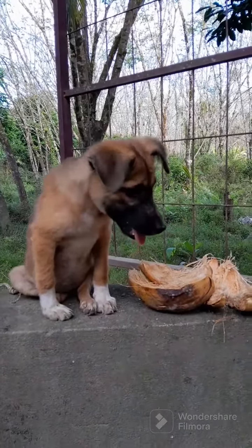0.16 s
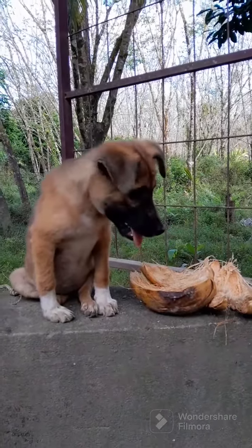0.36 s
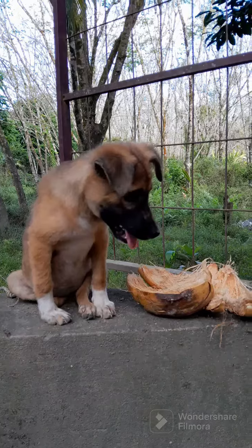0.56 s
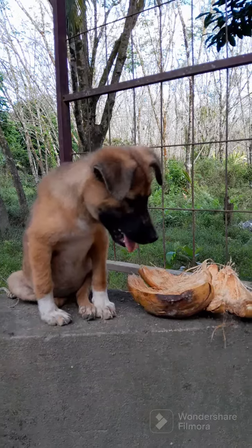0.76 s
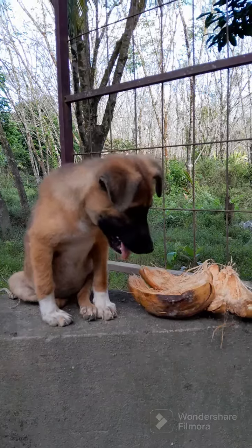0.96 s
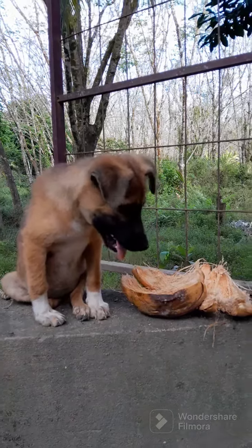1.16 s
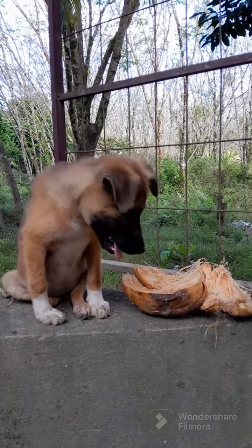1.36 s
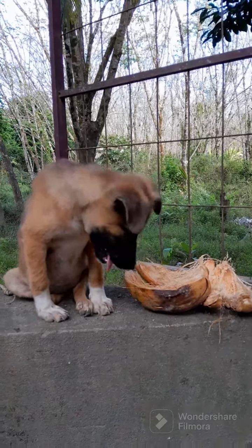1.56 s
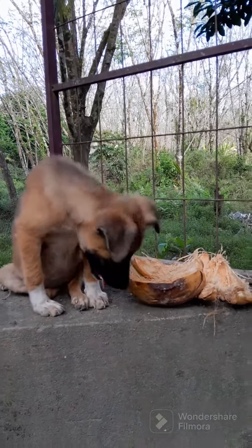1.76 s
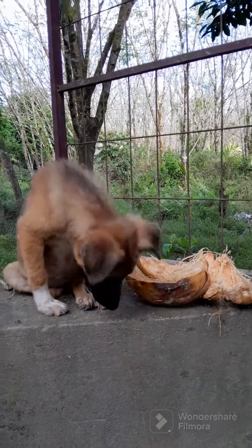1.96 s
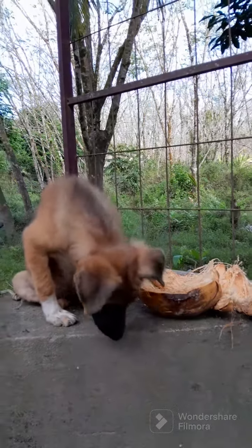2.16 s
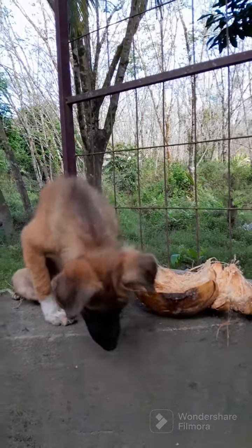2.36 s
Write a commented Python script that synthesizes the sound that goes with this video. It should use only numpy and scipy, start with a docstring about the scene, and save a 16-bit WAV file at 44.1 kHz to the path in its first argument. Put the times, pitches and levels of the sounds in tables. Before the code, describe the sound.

Two short gritty scuffs with soft low thumps on concrete, close to the microphone, then a single bright rising bird chirp echoing among trees, over quiet outdoor air, a distant motor hum and thin insect hiss.

```python
"""Scuffs and a chirp in a concrete yard by a wood

Two soft, gritty scuffs with low thumps sound close by, like steps on concrete; a few faint taps follow.
The scuffs are noise bursts that ring resonances; the thumps are filtered pushes that ring low modes.
A bird gives one loud rising chirp, a sweeping sine with overtones and hiss that rings among the trees.
Faint short glides are other calls, far off. Behind them lie a distant motor's hum, made of wavering
sines, and a low rumble, soft air and a thin hiss of insects, all made of coloured noise."""
import sys
import numpy as np
from scipy import signal
from scipy.fft import rfft, irfft
from scipy.io import wavfile

SR = 44100
rng = np.random.default_rng(int(sys.argv[2]) if len(sys.argv) > 2 else 0)


def bounce(signal):
    """Save signal as a 16-bit WAV file at the path given by the first command-line argument."""
    frames = np.transpose(np.atleast_2d(signal))
    limited = np.clip(frames, -1, 1)
    pcm = np.round(limited * 32767).astype(np.int16)
    wavfile.write(sys.argv[1], SR, pcm)


N = 110250
T = np.arange(N) / SR

# how alike left and right are in the chirp's hiss and the background: pitch_hz, correlation (-1 to 1)
STEREO_LIKENESS = [(100, 0.67), (300, 0.35), (700, 0.36), (1400, 0.11), (2800, -0.14), (6000, 0.021),
                   (14000, 0.0092)]
WOOD_T60_S = 0.34   # how long the trees ring on


def from_db(db):
    """Decibels to gain."""
    return 10 ** (np.asarray(db) / 20)


def rms_one(x):
    """Scale to rms 1."""
    return x / np.sqrt(np.mean(x ** 2) + 1e-20)


def in_time(rows):
    """Draw each column of a breakpoint curve at every sample."""
    s, *columns = np.transpose(rows)
    return [np.interp(T, s, column) for column in columns]


def at_hz(points, hz):
    """Read a spectrum on a log-frequency axis."""
    f, value = np.transpose(points)
    return np.interp(np.log(hz + 1), np.log(f), value)


def pan(db):
    """Left and right gains for a left-over-right level difference, at constant power."""
    return rms_one(from_db(np.array([[db], [-db]]) / 2))


def drift(rate_hz):
    """Random motion with spread 1: noise whose movement above the rate is damped."""
    hz = np.arange(N // 2 + 1) * SR / N
    return rms_one(irfft(rfft(rng.standard_normal(N)) / (1 + (hz / rate_hz) ** 2), N))


def coloured(spectrum, likeness, source=None):
    """Stereo noise (or two given signals) with a spectrum and a left-right likeness; rms 1."""
    hz = np.arange(N // 2 + 1) * SR / N
    mid, side = rfft(rng.standard_normal((2, N)) if source is None else source)
    alike = np.clip(at_hz(likeness, hz), -1, 1)
    shared = np.sqrt(1 + alike) * mid
    opposed = np.sqrt(1 - alike) * side * [[1], [-1]]
    return rms_one(irfft(from_db(at_hz(spectrum, hz)) * (shared + opposed), N))


def ring(x, hz, t60):
    """A two-pole resonator: a unit click sets a sine of height 1 ringing and dying."""
    radius = from_db(-60 / (t60 * SR))
    w = 2 * np.pi * hz / SR
    return signal.lfilter([0, np.sin(w)], [1, -2 * radius * np.cos(w), radius ** 2], x + 1e-18)


def echoes(x, t60):
    """Dense dying reflections from 4 ms on, different in each ear, with unit energy."""
    t = T[:SR]
    tail = rng.standard_normal((2, SR)) * from_db(-60 * t / t60) * (t > .004)
    tail /= np.sqrt(np.sum(tail ** 2, axis=1, keepdims=True))
    return signal.fftconvolve(np.atleast_2d(x), tail, axes=1)[:, :N]


def grains():
    """Sand grains cracking at random over a smooth rub."""
    grains_per_s, crack_share = 2500, 0.55   # share of the power
    cracks = rms_one(rng.standard_normal((2, N)) * (rng.random(N) < grains_per_s / SR))
    rub = rng.standard_normal((2, N))
    return np.sqrt(crack_share) * cracks + np.sqrt(1 - crack_share) * rub


def scuffs():
    """Each contact is a quick burst of dull crunch and bright grit; the crunch rings a few resonances."""
    # gritty contacts: start_s, crunch_level_db, grit_level_db, decay_s (time constant)
    contacts = [(0.2196, -36, -50, 0.005), (0.228, -42, -60, 0.0037), (0.23, -48, -40, 0.0039),
                (0.235, -33, -43, 0.0048), (0.246, -48.5, -51, 0.019), (0.280, -42, -66, 0.0025),
                (0.286, -39.5, -57, 0.0039), (0.2965, -39, -50, 0.0031), (0.336, -68, -68, .03),
                (0.374, -72.5, -67, 0.057), (0.424, -67.5, -71, 0.033), (0.45, -52.5, -61, 0.015),
                (0.468, -45, -52.5, 0.0053), (0.485, -47, -57, 0.0069), (0.501, -59, -57, 0.023),
                (0.509, -48, -77, 0.0051), (0.553, -64.5, -64.5, 0.035), (0.622, -93, -61, 0.0015),
                (1.167, -64, -71, .003), (1.738, -78, -75, 0.022), (2.333, -58.5, -63, 0.001)]
    # colours of the dull crunch and the bright grit: pitch_hz, relative_level_db (per Hz)
    crunch_colour = [(100, -4.5), (300, -9.5), (390, -4), (470, -7), (570, 2), (660, -5.5), (780, 1.5),
                     (1000, -3.5), (1200, -4.5), (1550, 1), (1900, -8.5), (2400, -8.5), (3200, -12.5),
                     (4200, -19), (9000, -54)]
    grit_colour = [(800, -44), (2500, -10), (4200, -0.5), (5700, 4.5), (8000, 1), (10000, -3.5),
                   (13000, -2), (16000, -6.5)]
    # left-right likeness of the scuffs: pitch_hz, correlation (-1 to 1)
    scuff_likeness = [(200, 0.93), (700, 0.82), (1400, 0.38), (2800, -0.58), (6000, 0.14), (14000, -0.18)]
    # resonances that the crunch sets ringing: pitch_hz, level_db, t60_s
    resonances = [(383.5, -3, 0.091), (600, -18, .08), (742, -5.5, 0.33), (992, -15, 0.042),
                  (1450, -33, 0.27), (1512, -2, 0.035)]
    shortest_attack_s, attack_per_decay = 0.0011, 0.28
    crunch_pan_db, yard_db, yard_t60_s = -1, -6, 0.17

    crunch_level, grit_level = 0, 0
    for s, crunch_db, grit_db, decay in contacts:
        age = np.maximum(T - s, 0)
        attack = shortest_attack_s + attack_per_decay * decay
        shape = np.minimum(age / attack, 1) * np.exp(-np.maximum(age - attack, 0) / decay)
        crunch_level = crunch_level + from_db(crunch_db) * shape
        grit_level = grit_level + from_db(grit_db) * shape
    crunch = pan(crunch_pan_db) * crunch_level * coloured(crunch_colour, scuff_likeness, grains())
    grit = grit_level * coloured(grit_colour, scuff_likeness, grains())
    rings = 0
    for hz, db, t60 in resonances:
        unit_peak = 2 * np.log(1000) / (t60 * SR)   # about gain 1 at the resonance
        rings = rings + from_db(db) * unit_peak * ring(crunch, hz, t60)
    close = crunch + rings + grit
    return close + from_db(yard_db) * echoes(close, yard_t60_s)


def thumps():
    """Soft pushes, with no deep bass in them, set a few damped modes swinging."""
    # pushes before filtering: start_s, level_db
    hits = [(0.2385, -15.5), (0.280, -25.5), (0.289, -25.5), (0.444, -41.5), (0.474, -41.5), (0.487, -45.5),
            (0.501, -39), (2.312, -50), (2.335, -46)]
    # damped low modes: pitch_hz, level_db, t60_s
    low_modes = [(66.2, 4, 0.14), (115, -12, 0.069), (157.4, -7, 0.044)]
    soft_hz, low_cut_hz = 195, 82.4
    pushes = np.zeros(N) + 1e-18
    for s, db in hits:
        pushes[int(s * SR)] = -from_db(db)
    pushes = signal.sosfilt(signal.butter(4, soft_hz, fs=SR, output="sos"), pushes)
    pushes = signal.sosfilt(signal.butter(3, low_cut_hz, "high", fs=SR, output="sos"), pushes)
    return sum(from_db(db) * ring(pushes, hz, t60) for hz, db, t60 in low_modes)


def near_bird():
    """A whistle sweeps up and levels off, with rough overtones and hiss; trees carry on its low start most."""
    # the sweep: start_s, pitch_hz, level_db (rms)
    sweep = [(0.750, 3067, -100), (0.765, 3500, -70), (0.787, 4610, -47), (0.808, 4893, -45.5),
             (0.826, 4912, -34.5), (0.835, 4938, -37.5), (0.843, 4892, -31.5), (0.848, 4980, -48),
             (0.865, 5010, -130)]
    # overtones: multiple of the pitch, level_db
    overtone_rows = [(2, -16), (3, -20)]
    # breathy hiss around the chirp: start_s, level_db (rms)
    hiss_level = [(0.70, -130), (0.748, -60.5), (0.785, -54.5), (0.81, -56), (0.84, -54.5), (0.87, -61),
                  (0.93, -75.5), (1.2, -130)]
    # its colour: pitch_hz, relative_level_db (per Hz)
    hiss_colour = [(600, -3.5), (2000, -6.5), (2800, -1.5), (3900, -2.5), (4600, 12), (5500, 4.5),
                   (8500, 1.5), (12000, -10), (16000, -7)]
    chirp_pan_db, wood_pan_db = 31, 3
    pitch_waver, overtone_rough_rad = 0.0035, 0.73
    overtone_follows, overtone_direct = 0.67, 0.2   # share of the tone's dB swell, dry gain
    tone_wet_db, sweep_wet_db_per_khz = -4.5, 11   # wet level at the top pitch, rise per kHz below it
    overtone_wet_db, overtone_t60_s = -6.5, 0.26

    hz, db = in_time(sweep)
    phase = 2 * np.pi * np.cumsum(hz * (1 + pitch_waver * drift(130))) / SR
    tone = np.sqrt(2) * from_db(db) * np.sin(phase)
    # overtones swell less than the tone
    overtone_level = np.sqrt(2) * from_db(db.max() + overtone_follows * (db - db.max()))
    overtones = 0
    for multiple, gain_db in overtone_rows:
        rough_phase = round(multiple) * phase + overtone_rough_rad * drift(830)
        overtones = overtones + overtone_level * from_db(gain_db) * np.sin(rough_phase)
    scattered = from_db(tone_wet_db + sweep_wet_db_per_khz * (hz.max() - hz) / 1000) * tone
    wood = echoes(scattered, WOOD_T60_S)
    wood = wood + from_db(overtone_wet_db) * echoes(overtones, overtone_t60_s)
    direct = tone + overtone_direct * overtones
    hiss = from_db(in_time(hiss_level)[0]) * coloured(hiss_colour, STEREO_LIKENESS)
    return pan(chirp_pan_db) * direct + pan(wood_pan_db) * wood + hiss


def glides(rows, waver, direct_db):
    """Short wavering whistles that swell and fade, heard through the wood."""
    out = 0
    wobble = 1 + waver * np.tanh(drift(250))
    for s, length, start_hz, end_hz, db, pan_db in rows:
        progress = np.clip((T - s) / length, 0, 1)
        hz = (start_hz + (end_hz - start_hz) * progress) * wobble
        whistle = np.sin(np.pi * progress) * np.sin(2 * np.pi * np.cumsum(hz) / SR)
        out = out + pan(pan_db) * from_db(db) * whistle
    return from_db(direct_db) * out + echoes(out, WOOD_T60_S)


def far_birds():
    """Far chirps: short sine glides, with their echoes louder than the direct sound."""
    # start_s, length_s, start_hz, end_hz, level_db (before direct gain and echoes), pan_db (left over right)
    far_calls = [(-0.03, 0.058, 5390, 5960, -55, 14), (-0.01, 0.057, 6230, 6200, -64.5, 1),
                 (0.135, 0.052, 6250, 5955, -58.5, 9), (0.15, 0.075, 4900, 5930, -68, 7),
                 (0.73, .06, 4900, 4710, -62, 21), (1.19, 0.097, 3580, 3010, -78, 14),
                 (2.21, 0.083, 5910, 4750, -71.5, 9), (2.255, 0.086, 5830, 4850, -74.5, 10),
                 (2.445, 0.07, 5470, 4880, -68.5, 10)]
    return glides(far_calls, waver=.055, direct_db=-3.5)


def low_whistles():
    """Faint low whistles: short sine glides, more direct than echoed."""
    # start_s, length_s, start_hz, end_hz, level_db (before direct gain and echoes), pan_db (left over right)
    low_calls = [(0.828, 0.027, 1120, 1000, -73, 18), (0.872, 0.038, 330, 682, -70.5, 6),
                 (0.893, 0.0225, 640, 910, -65.5, -2)]
    return glides(low_calls, waver=0.059, direct_db=6)


def motor():
    """A far motor's low orders waver together in pitch; the two lowest swell and sink the most."""
    # motor orders before the swell: pitch_hz, level_db (rms)
    orders = [(54.5, -74), (108.5, -66.5), (166.5, -77), (220, -89), (272, -84), (326, -87.5)]
    # swell of the hum: start_s, level_db (added to the orders)
    hum_swell = [(0, -4.5), (0.3, 7.5), (0.55, 14), (0.78, 5.5), (0.9, 1), (1.3, -3.5), (1.6, 3.5),
                 (2.0, 0.5), (2.25, -9.5), (2.5, 3.5)]
    pitch_waver, flutter_db, upper_follows = 0.0143, 1, 0.68
    turns = np.cumsum(1 + pitch_waver * drift(3.9)) / SR
    swell_db, = in_time(hum_swell)
    out = 0
    for k, (hz, db) in enumerate(orders):
        follows = 1 if k < 2 else upper_follows
        level = from_db(db + follows * swell_db + flutter_db * drift(3.2))
        out = out + level * np.sin(2 * np.pi * (hz * turns + rng.random()))
    return np.sqrt(2) * out


def rumble():
    """Low noise that slowly swells and sinks."""
    # colour: pitch_hz, relative_level_db (per Hz)
    rumble_colour = [(15, -55.5), (28, -17), (45, 3), (70, 2.5), (110, 1), (160, -9.5), (300, -15),
                     (600, -37)]
    # level curve: start_s, level_db (rms)
    rumble_level = [(0, -56.5), (0.15, -61.5), (0.35, -55), (0.65, -61), (0.95, -67.5), (1.1, -63.5),
                    (1.5, -64.5), (1.8, -65.5), (1.9, -64), (2.01, -64.5), (2.08, -68), (2.5, -61.5)]
    return from_db(in_time(rumble_level)[0]) * coloured(rumble_colour, STEREO_LIKENESS)


def air():
    """Soft noise, strongest in the low mids, with a gently moving level."""
    # colour: pitch_hz, relative_level_db (per Hz)
    air_colour = [(100, -30), (300, 2.5), (500, 1), (900, -1), (1100, -4), (1320, 0), (1600, -8),
                  (2500, -9), (4500, -10), (6500, -14.5), (12000, -17.5), (16000, -10.5)]
    # level curve: start_s, level_db (rms)
    air_level = [(0, -74.5), (0.3, -69), (0.7, -70.5), (1.1, -74), (2.1, -73.5), (2.5, -72.5)]
    return pan(1.5) * from_db(in_time(air_level)[0]) * coloured(air_colour, STEREO_LIKENESS)


def insects():
    """A thin hiss of insects: high noise in narrow and broad bands, its level fluttering a little."""
    # colour: pitch_hz, relative_level_db (per Hz)
    insect_colour = [(6000, -48), (6900, -25), (7130, 8), (7400, -1.5), (8500, 2), (9700, -3), (10600, 4.5),
                     (11700, -11.5), (16000, -18)]
    level_db, flutter_db, pan_db = -75, 1.5, 6
    level = from_db(level_db + flutter_db * drift(9))
    return pan(pan_db) * level * coloured(insect_colour, STEREO_LIKENESS)


def scene():
    """Everything at the microphone."""
    steps = scuffs() + thumps()
    birds = near_bird() + far_birds() + low_whistles()
    return steps + birds + motor() + rumble() + air() + insects()


def record(dry):
    """The top is cut steeply by an elliptic low-pass."""
    cutoff_hz = 15800
    return signal.sosfilt(signal.ellip(12, .1, 70, cutoff_hz, fs=SR, output="sos"), dry)


dry = scene()
out = record(dry)
bounce(out)
```